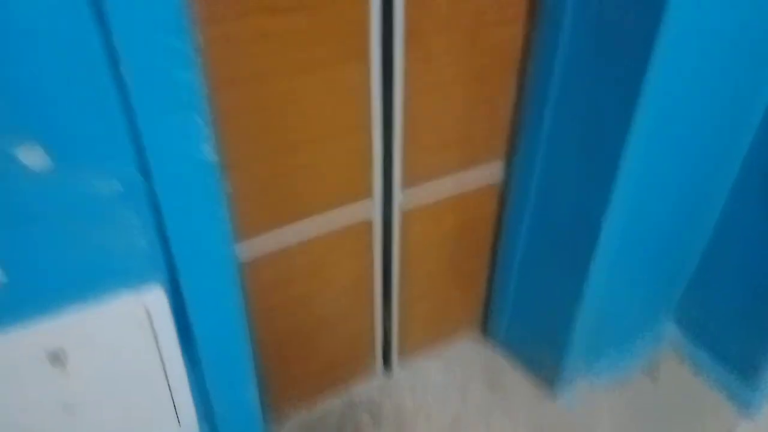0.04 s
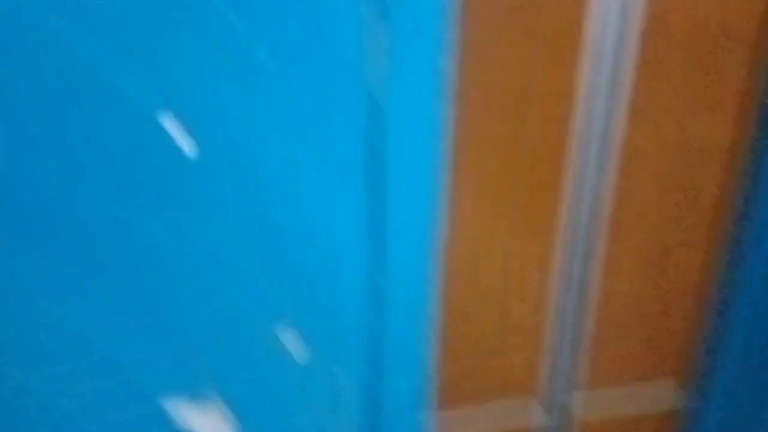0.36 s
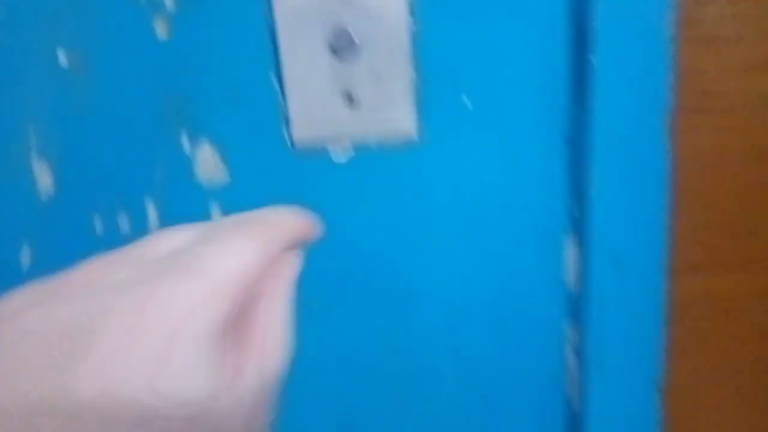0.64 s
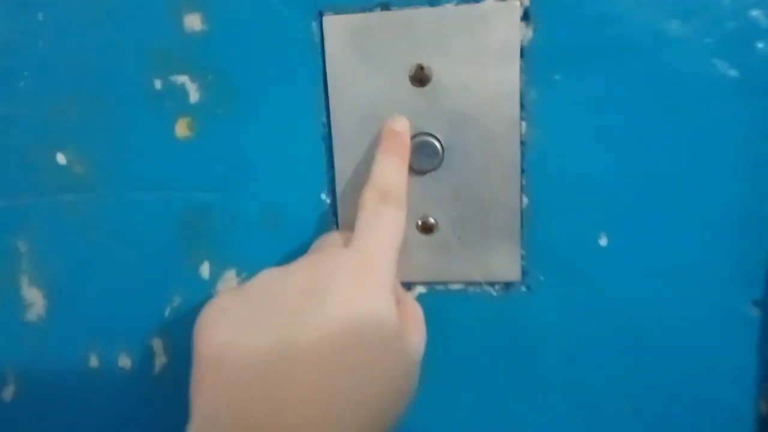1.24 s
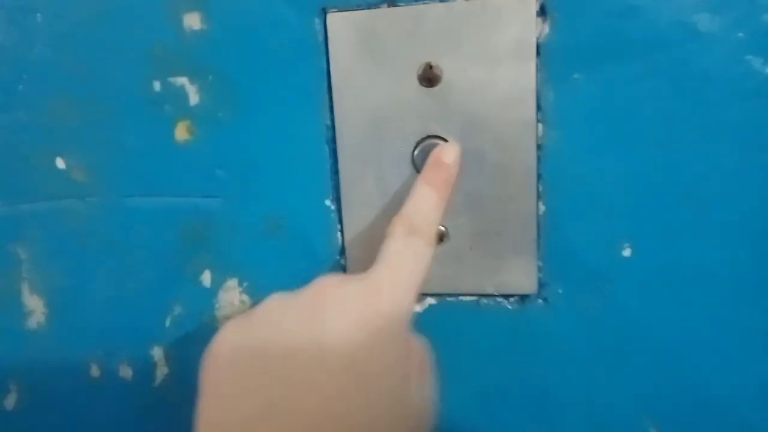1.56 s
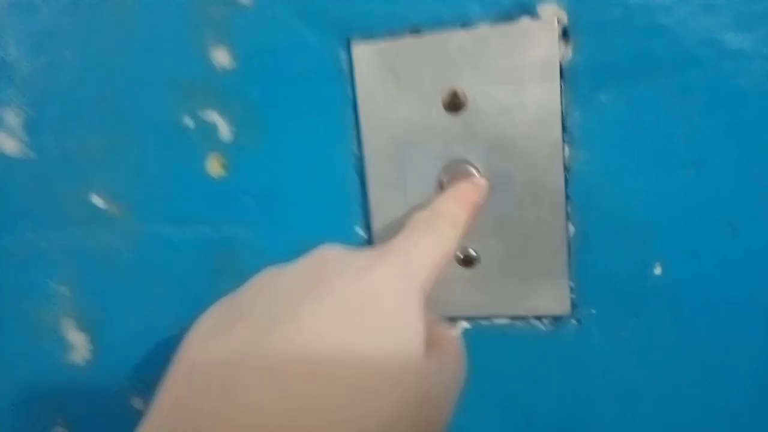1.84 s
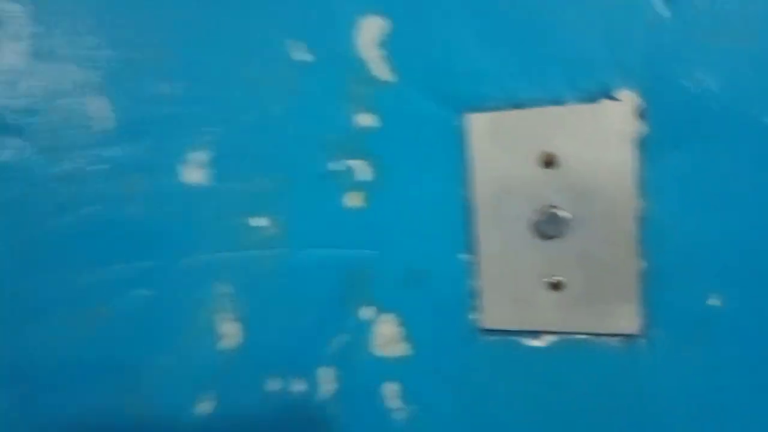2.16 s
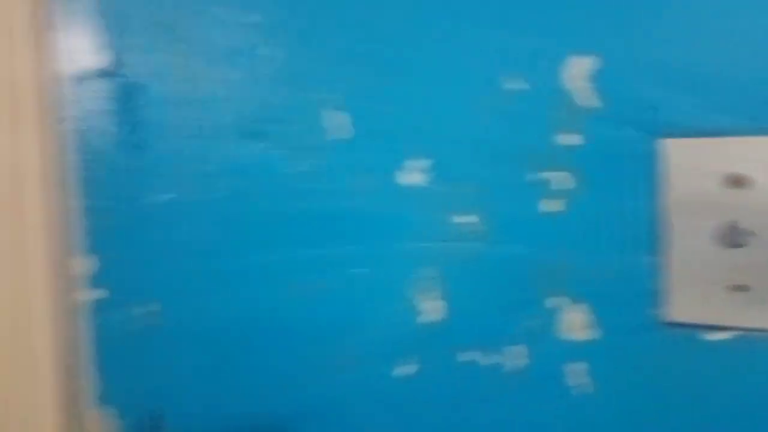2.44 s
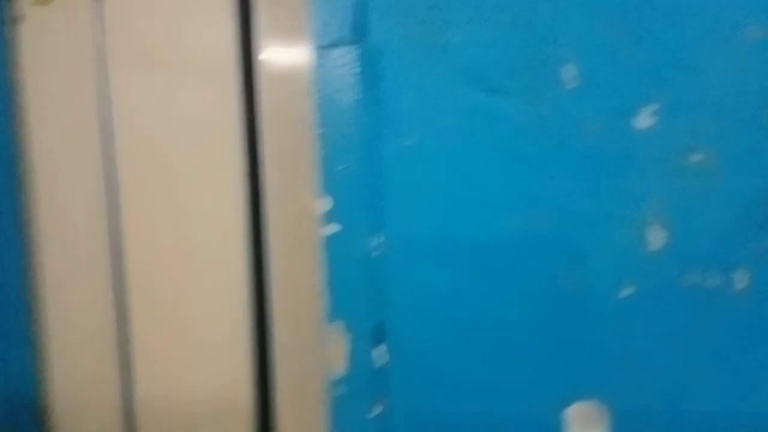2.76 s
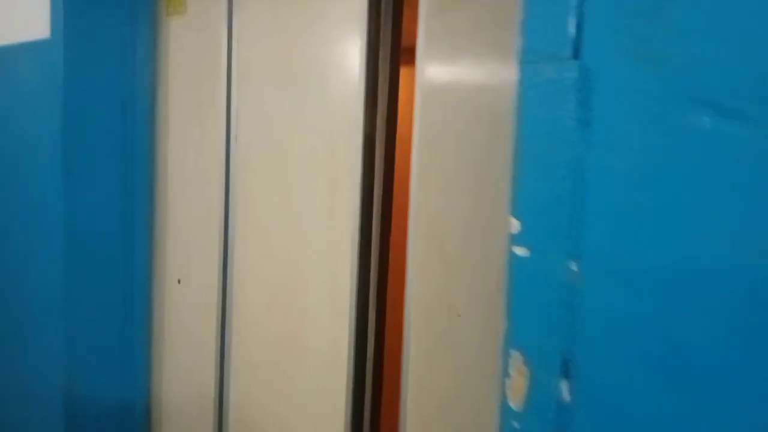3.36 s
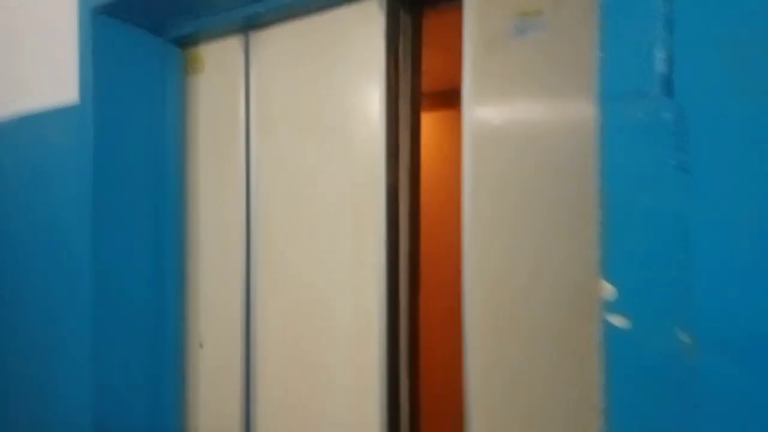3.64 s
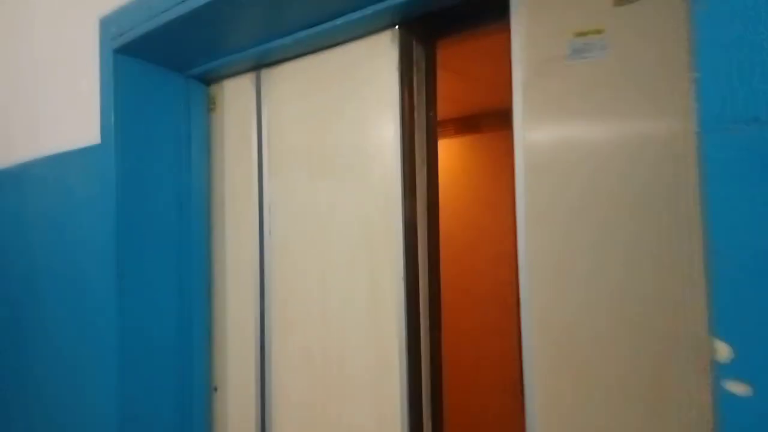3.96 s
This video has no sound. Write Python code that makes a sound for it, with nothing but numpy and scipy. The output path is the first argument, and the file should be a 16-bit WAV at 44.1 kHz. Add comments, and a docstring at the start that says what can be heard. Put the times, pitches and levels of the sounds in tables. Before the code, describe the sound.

An old lift is called and opens in an echoing stairwell. A sleeve rustles close by with soft handling knocks. At 1.6 seconds the button scrapes in and squeaks, then at 1.9 it snaps back loudly, its steel plate ringing as a motor starts humming. From 2.5 seconds a latch clanks farther off, and the doors rumble open until 4 seconds, panels booming softly and rollers ticking.

```python
"""An old lift in a hard-walled stairwell, heard from beside the call button. A sleeve rustles as an arm
reaches out, with soft handling knocks close to the microphone. At 1.6 s the button scrapes in, knocks
and squeaks; it snaps back against its ringing steel plate as the door motor starts up. From 2.5 s the
latch clanks farther off in the shaft, and the doors rumble open, panels booming and rollers ticking."""
import sys
import numpy as np
from scipy import signal
from scipy.fft import rfft, irfft
from scipy.io import wavfile

SR = 44100
rng = np.random.default_rng(int(sys.argv[2]) if len(sys.argv) > 2 else 0)


def output_pcm(signal):
    """Save a mono or channel-first signal as 16-bit PCM at the path in sys.argv[1].

    Samples are clipped to [-1, 1] before scaling.
    """
    pcm = np.clip(np.atleast_2d(signal).T, -1, 1) * 32767
    wavfile.write(sys.argv[1], SR, np.round(pcm).astype(np.int16))


N = 176400
T = np.arange(N) / SR


def from_db(db):
    """Decibels to gain."""
    return 10 ** (np.asarray(db) / 20)


def rms_one(x):
    """Scale to unit rms."""
    return x / np.sqrt(np.mean(x ** 2) + 1e-20)


def level(rows):
    """Gain over time from (time [s], level [dB]) points, fading quickly outside them."""
    s, db = np.transpose(rows)
    outside = np.maximum(s[0] - T, 0) + np.maximum(T - s[-1], 0)
    return from_db(np.interp(T, s, db) - 200 * outside)


def at_hz(points, hz):
    """Read a table on a log-frequency axis."""
    f, value = np.transpose(points)
    return np.interp(np.log(hz + 1e-3), np.log(f), value)


def coloured(x, colour):
    """Give a signal a spectrum; unit rms."""
    gain = from_db(at_hz(colour, np.fft.rfftfreq(N, 1 / SR)))
    return rms_one(irfft(rfft(x) * gain, N))


def shaped(x, colour):
    """Colour a burst and keep its energy."""
    return coloured(x, colour) * np.sqrt(np.mean(x ** 2))


def low_cut(x, hz):
    """Second-order high-pass."""
    return signal.sosfilt(signal.butter(2, hz, "high", fs=SR, output="sos"), x)


def noise():
    """White noise."""
    return rng.standard_normal(N)


def drift(rate_hz):
    """Smooth random wander of unit rms."""
    step, settle = 20, 2000
    pole = np.exp(-2 * np.pi * rate_hz * step / SR)
    white = rng.standard_normal(N // step + settle + 2)
    slow = signal.lfilter([1], [1, -2 * pole, pole * pole], white)[settle:]
    return np.interp(np.arange(N) / step, np.arange(len(slow)), rms_one(slow))


def grains(per_s, spread_db):
    """Random tiny impacts of uneven size; unit rms."""
    sizes = from_db(spread_db * np.minimum(rng.exponential(1, N), 4))
    return rms_one((rng.random(N) < per_s / SR) * sizes * rng.choice([-1, 1], N))


def click(s, db):
    """One impulse."""
    return from_db(db) * (np.arange(N) == int(s * SR))


def dying(s, decay_s):
    """Sudden start and exponential fall."""
    return (T >= s) * np.exp(-np.abs(T - s) / decay_s)


def rattle(s, db, decay_s):
    """A dying burst of contacts with the energy of one impulse."""
    t = T[:SR // 4]
    burst = rng.standard_normal(len(t)) * np.exp(-t / decay_s)
    return np.pad(from_db(db) * burst / np.linalg.norm(burst), (int(s * SR), N))[:N]


def ring(x, modes):
    """Each unit impulse sets every mode ringing at its level."""
    out = 0
    for hz, db, t60 in modes:
        r, w = from_db(-60 / (t60 * SR)), 2 * np.pi * hz / SR
        mode = signal.lfilter([0, np.sin(w)], [1, -2 * r * np.cos(w), r * r], x + 1e-18)
        out = out + from_db(db) * mode
    return out


def rough_tone(rows, width_hz):
    """A narrow band of friction noise that follows (time [s], pitch [Hz], level [dB]) points."""
    s, hz, db = np.transpose(rows)
    phase = 2 * np.pi * np.cumsum(np.interp(T, s, hz)) / SR
    return level(np.c_[s, db]) * (drift(width_hz) * np.cos(phase) + drift(width_hz) * np.sin(phase))


def hall_response():
    """Diffuse echoes off the hard walls build up fast and die soonest in the top treble."""
    # reverberation time (frequency [Hz], t60 [s])
    decay = [(100, 1.3), (500, 0.78), (2000, 0.97), (4000, 1.18), (8000, 0.59), (15000, 0)]
    # colour of the echoes (frequency [Hz], gain [dB])
    colour = [(100, 1), (600, 1), (1500, 1.5), (2500, -4.1), (4000, 2), (6000, 0.22), (8200, 6.5),
              (15000, -2)]
    edges_hz, build_s = np.geomspace(60, 16000, 13), 0.0067
    out, t = 0, T[:SR]
    for band in zip(edges_hz, edges_hz[1:]):
        hz = np.sqrt(band[0] * band[1])
        band_pass = signal.butter(2, band, "band", fs=SR, output="sos")
        echoes = signal.sosfilt(band_pass, rng.standard_normal(SR))
        out = out + echoes * from_db(at_hz(colour, hz) - 60 * t / at_hz(decay, hz))
    out = out * (1 - np.exp(-t / build_s))
    return out / np.linalg.norm(out) / 2


def echo(x, hall):
    """The stairwell's answer to a sound."""
    return signal.fftconvolve(x, hall)[:N]


def room_tone():
    """The still air of the stairwell, faint and low."""
    # background spectrum (frequency [Hz], gain [dB])
    colour = [(15, -59), (25, -29), (43, -29), (62, -6), (86, 1), (101, -7.5), (389, -12), (469, -22),
              (2170, -24), (6210, -42.5), (15500, -47.5)]
    return from_db(-72.5) * coloured(noise(), colour)


def sleeve():
    """Close and dry, cloth slides over cloth with crease snaps, hiss and a rough whistle of the weave."""
    # rustle and high hiss (time [s], level [dB])
    rub_level = [(0.0, -74), (0.04, -70.5), (0.056, -62.5), (0.098, -65.5), (0.11, -58), (0.138, -62.5),
                 (0.298, -56.5), (0.48, -65), (0.726, -52.5), (0.89, -55), (0.98, -54), (1.31, -65.5),
                 (1.376, -71.5), (1.6, -73.5)]
    hiss_level = [(0, -83), (.12, -73.5), (.24, -79), (.275, -64.5), (.33, -73), (.42, -82), (.615, -83),
                  (.63, -64.5), (.8, -72.5), (1.05, -72.5), (1.2, -87), (1.4, -100)]
    # their spectra (frequency [Hz], gain [dB])
    rub_colour = [(35, -44), (60, -12), (91, -16), (139, -1.5), (236, -6), (335, -5), (475, -6),
                  (953, -9.5), (1630, -8.5), (2100, -4.5), (3340, -8.5), (6260, -28.5), (8270, -27.5),
                  (12300, -45), (15500, -46)]
    hiss_colour = [(2500, -28), (4500, 7), (6300, -10), (8400, 2.5), (10000, -8), (12500, -14),
                   (15300, -10)]
    # whistle of the weave (time [s], pitch [Hz], level [dB])
    weave = [(.1, 2150, -80), (.3, 2000, -68), (.5, 1930, -66), (.6, 1920, -62), (.75, 2230, -58),
             (.88, 2100, -65.5), (1, 1970, -59), (1.09, 1920, -68), (1.15, 2300, -68), (1.35, 2350, -76)]
    rub = coloured(noise() + from_db(-15) * grains(per_s=110, spread_db=4), rub_colour)
    hiss = coloured(noise() + 0.52 * grains(per_s=600, spread_db=5.5), hiss_colour)
    cloth = level(rub_level) * rub + level(hiss_level) * hiss + rough_tone(weave, width_hz=120)
    return cloth * from_db(.7 * drift(19))


def handling():
    """Dull knocks close to the microphone, each a damped sine."""
    # soft knocks (time [s], pitch [Hz], level [dB], t60 [s])
    bumps = [(0.058, 1300, -50, 0.0029), (0.0562, 3900, -47.5, .004), (.058, 87, -48, .09),
             (0.1089, 920, -32.5, 0.0025), (0.11, 260, -43.5, 0.016), (.114, 3800, -45, .004),
             (0.1144, 477, -44, 0.0059), (0.258, 116, -48, 0.05), (0.634, 140, -52.5, 0.25),
             (0.681, 147, -52, 0.27)]
    return sum(from_db(db) * dying(s, t60 / np.log(1000)) * np.sin(2 * np.pi * hz * (T - s))
               for s, hz, db, t60 in bumps)


def button_press(hall):
    """The button scrapes in, bottoms out with a hollow knock and squeaks under the finger."""
    # scrapes against its housing (time [s], level [dB], decay [s])
    scrapes = [(1.6203, -29, 0.021), (1.626, -28, 0.011), (1.635, -21, 0.011), (1.662, -23.5, 0.0062)]
    # their spectrum (frequency [Hz], gain [dB])
    scrape_colour = [(300, -8), (600, -0.5), (1800, 1), (2700, 4), (4200, 0.5), (5500, -22), (9000, -22),
                     (12500, -24), (15000, -20)]
    # hits on the stop (time [s], level [dB])
    hits = [(1.658, -40.5), (1.6599, -36), (1.6655, -48)]
    # hollow modes (frequency [Hz], gain [dB], t60 [s])
    modes = [(424, -13, 0.057), (609, -11.5, 0.18), (1134, -6, 0.027), (1610, -8, 0.018), (2260, 1, 0.023),
             (2680, -10, 0.023)]
    # squeak harmonics, lowest first (level [dB])
    partials_db = [-43, -72, -70]
    scrape = shaped(sum(rattle(s, db, decay_s) for s, db, decay_s in scrapes), scrape_colour)
    knock = low_cut(ring(sum(click(s, db) for s, db in hits), modes), 320)
    direct = scrape + knock + squeak(1.724, length_s=.021, hz=2850, partials_db=partials_db)
    return direct + echo(direct, hall)


def squeak(s, length_s, hz, partials_db):
    """A short, slightly rough stick-slip tone that swells, sags in pitch and stops."""
    jitter, sag_hz_per_s = .012, 4500
    t = np.clip(T - s, 0, length_s)
    uneven_t = t + jitter * np.cumsum(drift(180)) / SR
    phase = 2 * np.pi * (hz * uneven_t - sag_hz_per_s * t * t / 2)
    tone = sum(from_db(db) * np.sin(k * phase) for k, db in enumerate(partials_db, 1))
    return np.sin(np.pi * t / length_s) * tone


def rollers():
    """The door rollers grind along their track with a gritty, wavering hiss."""
    # rolling noise (time [s], level [dB])
    track_level = [(1.7, -78), (1.86, -55.5), (2.2, -49), (2.5, -55), (2.8, -56.5), (3.1, -53), (3.3, -53),
                   (3.46, -52), (3.51, -47.5), (3.6, -47), (3.72, -45), (3.82, -43.5), (3.9, -45.5),
                   (4, -46.5)]
    # its spectrum (frequency [Hz], gain [dB])
    track_colour = [(240, -21), (400, 1.5), (643, -1), (705, -2), (1110, -5), (1200, -9.5), (2020, -3.5),
                    (3790, -13.5), (6280, -33), (7780, -28), (8660, -28), (12100, -55.5), (15500, -39)]
    grind = coloured(noise() + .5 * grains(per_s=400, spread_db=3.5), track_colour)
    return level(track_level) * grind * from_db(1.6 * drift(10.6))


def drive():
    """Gearing rumbles through the shaft; the motor hums unsteadily and groans as it takes the load."""
    # gear rumble and motor hum (time [s], level [dB])
    rumble_level = [(1.73, -68.5), (1.93, -47.5), (2.1, -46.5), (2.61, -50.5), (2.63, -46), (2.77, -48),
                    (2.88, -47), (3.26, -49), (3.3, -44.5), (3.36, -51), (3.42, -45.5), (3.44, -53),
                    (3.56, -45.5), (3.89, -44.5), (3.9, -50), (4.0, -43)]
    hum_level = [(1.8, -63), (2.1, -76), (2.22, -49), (2.55, -48.5), (2.8, -37.5), (3.15, -43), (3.3, -60),
                 (4, -56)]
    # rumble spectrum and hum lines (frequency [Hz], gain [dB])
    rumble_colour = [(48, -15), (70, -2.5), (110, 1), (170, -1), (240, -2), (330, -3.5), (480, -11.5),
                     (800, -12), (1600, -15.5), (4000, -52)]
    hum_lines = [(65.6, -11), (131, -17.5)]
    # groan under load (time [s], pitch [Hz], level [dB])
    groan = [(2.0, 254, -65), (2.08, 273, -47), (2.13, 322.6, -55), (2.2, 344.2, -50), (2.3, 346, -56)]
    uneven_t = T + np.cumsum(0.011 * drift(7.1)) / SR
    tone = sum(from_db(db) * np.sqrt(2) * np.sin(2 * np.pi * hz * uneven_t) for hz, db in hum_lines)
    rumble = level(rumble_level) * coloured(noise(), rumble_colour)
    hum = level(hum_level) * tone * from_db(2.1 * drift(8))
    return hum + rumble + rough_tone(groan, width_hz=31)


def button_release(hall):
    """The button springs back with a crack and chatters on its stop; its steel plate rings on."""
    # spectrum of the crack (frequency [Hz], gain [dB])
    crack_colour = [(300, -15), (600, 0), (1500, 3), (4300, 0.5), (5600, -7.5), (7400, -8), (8500, -6),
                    (10500, -9.5), (12200, -7), (13200, -6), (15300, -9)]
    # damped button modes (frequency [Hz], peak [dB], t60 [s])
    button_modes = [(537, -26, 0.029), (1100, -32.5, 0.032), (1550, -23, 0.022), (2147, -21.5, 0.023),
                    (2420, -15, 0.011), (2615, -13.5, 0.013), (3480, -26.5, 0.014), (4022, -18, 0.014),
                    (4890, -34, 0.017), (8120, -33, 0.011), (12000, -45, .012)]
    # ringing plate modes (frequency [Hz], gain [dB], t60 [s])
    plate_modes = [(612, -14, .5), (1088, -11, .8), (1140, -13, .6), (1611, -14, .6), (1761, -11, .62),
                   (2192, -8, .9), (2379, 0, .3), (2471, -6, .5), (2509, -4, .53), (2538, -4, .66),
                   (3454, -10, .47), (3912, -9, .5), (3953, -7, .5), (4094, -6, .56), (4264, -17, .68),
                   (4436, -15, .6), (4976, -17, .5), (6062, -24, .47), (8104, -11, .3)]
    snap_s, bounce_s, count, spread_db = 1.8985, .0014, 4, 0.5
    body = shaped(rattle(snap_s, db=-6, decay_s=0.0085), crack_colour)
    bounces = ((snap_s + bounce_s * np.arange(count)) * SR).astype(int)
    for hz, db, t60 in button_modes:
        contacts = np.zeros(N)  # each bounce meets each mode differently
        contacts[bounces] = rng.choice([-1, 1], count) * from_db(-spread_db * rng.standard_normal(count))
        mode = ring(contacts, [(hz, 0, t60)])
        body = body + from_db(db) * mode / np.abs(mode).max()
    body = low_cut(body, 400)
    plate = ring(click(snap_s, db=-33), plate_modes)
    return body + plate + from_db(0.5) * echo(body, hall)


def latch(hall):
    """Steel links clatter and ring behind the doors, set back in the shaft's echo."""
    # latch and linkage clanks (time [s], clatter level [dB], decay [s], ring level [dB])
    clanks = [(2.547, -43, 0.06, -55), (2.789, -42.5, 0.094, -64), (2.871, -38, 0.074, -35.5)]
    # clatter spectrum (frequency [Hz], gain [dB])
    colour = [(150, -40), (250, -8.5), (335, -3), (593, -10), (1590, -11), (1790, -20), (2280, -5),
              (2620, -16), (3270, -12.5), (5790, -36.5), (8610, -40), (15500, -52)]
    # steel latch modes (frequency [Hz], gain [dB], t60 [s])
    modes = [(335, -5, .15), (1585, -8, .12), (2310, 2, .22), (3235, -9, .06), (7370, -8, .05),
             (7750, -8, .02), (8300, -7, .02), (8830, -8, .018), (10000, -13, .012), (10680, -18, .012),
             (13500, -16, .003)]
    bursts = sum(from_db(db) * dying(s, decay_s) for s, db, decay_s, _ in clanks)
    clatter = bursts * coloured(grains(per_s=2500, spread_db=2.5), colour)
    contacts = sum(rattle(s, ring_db, decay_s=.03) for s, _, _, ring_db in clanks)
    direct = clatter + ring(contacts, modes)
    return from_db(-2.5) * direct + from_db(1.5) * echo(direct, hall)


def door_panels():
    """The sheet panels boom when jolted."""
    # jolts (time [s], level [dB])
    jolts = [(2.63, -42.5), (2.799, -49), (2.97, -48), (3.131, -44), (3.275, -38.5), (3.401, -44.5),
             (3.58, -46), (3.711, -41.5), (3.799, -41), (3.949, -47)]
    # panel modes (frequency [Hz], gain [dB], t60 [s])
    modes = [(99.7, 1.5, 0.6), (188.1, 2, 0.35), (326, -11, 0.28), (421, -16, .3), (489, -7, 0.26)]
    rise_s = .012
    hits = sum(click(s, db) for s, db in jolts)
    onset = [(hz, db, rise_s * np.log(1000)) for hz, db, _ in modes]
    return ring(hits, modes) - ring(hits, onset)  # taking away a fast-dying copy softens the attack


def roller_ticks(hall):
    """Rollers and chain tick and dry bearings chirp, echoing up the stairwell."""
    # ticks (time [s], level [dB])
    ticks = [(2.788, -41), (3.123, -35.5), (3.282, -39.5), (3.41, -34.5), (3.572, -28), (3.673, -25.5),
             (3.682, -30.5), (3.755, -35), (3.792, -23), (3.841, -36), (3.951, -36)]
    # their spectrum (frequency [Hz], gain [dB])
    colour = [(1000, -6), (2200, -3), (4000, 3), (6000, -8.5), (7500, 0), (8500, 2.5), (10000, -9.5),
              (11500, -20), (15000, -28)]
    # bearing chirps (time [s], length [s], pitch [Hz], level [dB])
    chirps = [(2.983, 0.0034, 3020, -37), (3.382, 0.025, 5500, -65), (3.396, 0.017, 4470, -53.5)]
    ticking = shaped(sum(rattle(s, db, decay_s=.007) for s, db in ticks), colour)
    direct = ticking + sum(squeak(s, length_s, hz, [db]) for s, length_s, hz, db in chirps)
    return direct + from_db(-2) * echo(direct, hall)


def scene():
    """All sources in the stairwell, at one mono microphone."""
    hall = hall_response()
    near = room_tone() + sleeve() + handling() + button_press(hall) + button_release(hall)
    lift = drive() + latch(hall) + rollers() + door_panels() + roller_ticks(hall)
    return (near + lift)[None]


def record(dry):
    """The recorder rounds the highest peaks and cuts the deep bass and the top."""
    ceiling, bass_hz, top_hz = .4, 45, 15450
    rounded = ceiling * np.tanh(dry / ceiling)
    top_cut = signal.ellip(10, .2, 70, top_hz, fs=SR, output="sos")
    return signal.sosfilt(top_cut, low_cut(rounded, bass_hz))


dry = scene()
out = record(dry)
output_pcm(out)
```